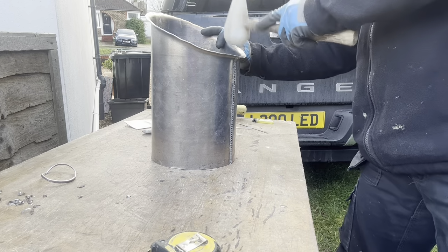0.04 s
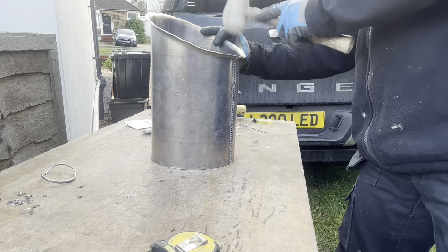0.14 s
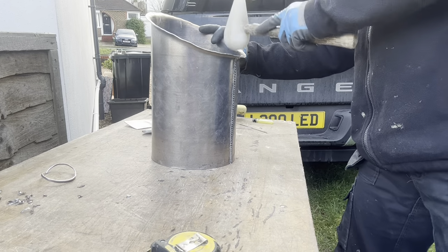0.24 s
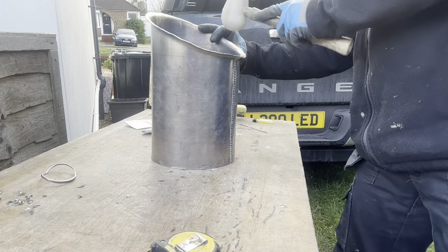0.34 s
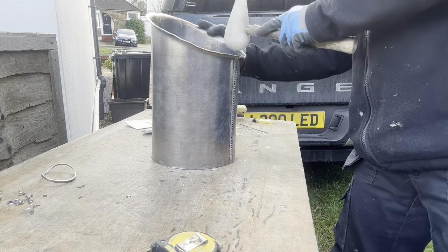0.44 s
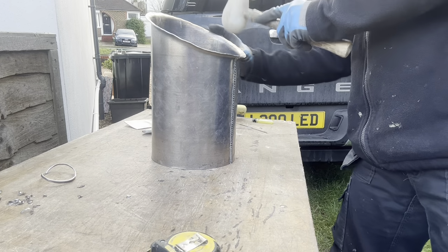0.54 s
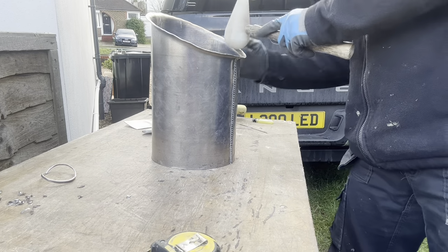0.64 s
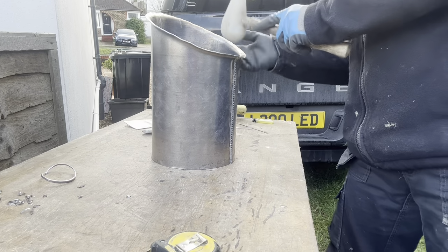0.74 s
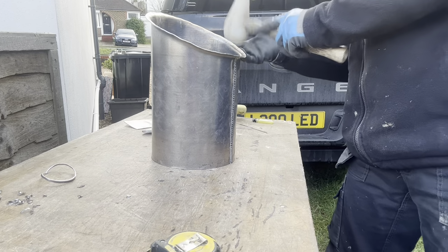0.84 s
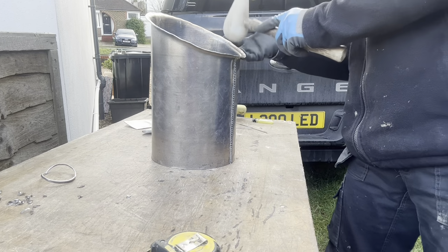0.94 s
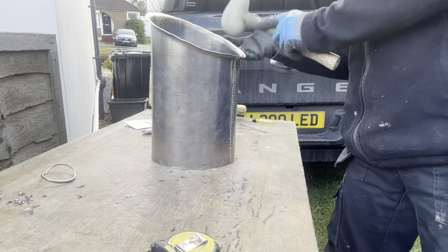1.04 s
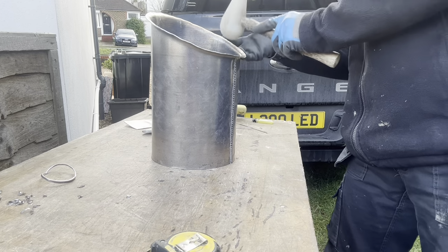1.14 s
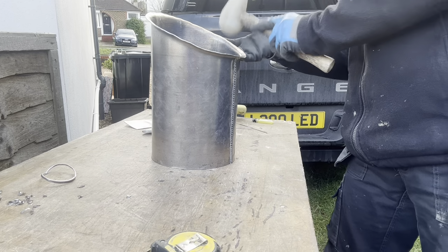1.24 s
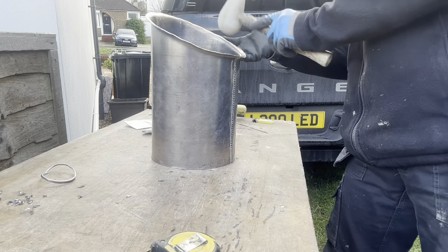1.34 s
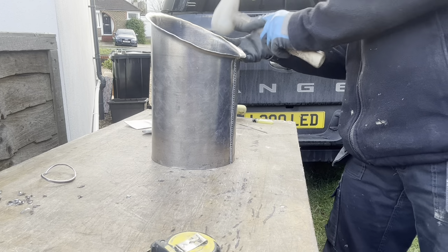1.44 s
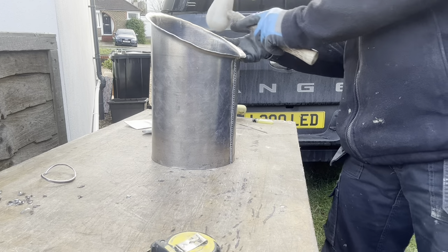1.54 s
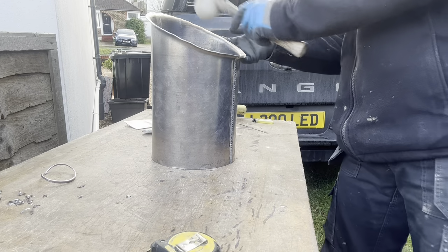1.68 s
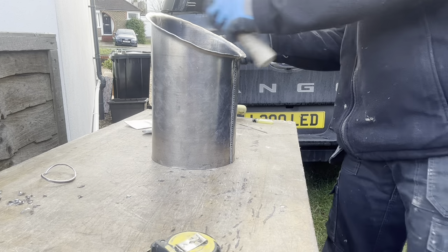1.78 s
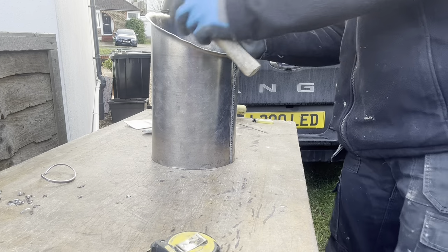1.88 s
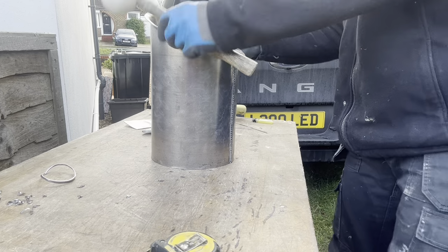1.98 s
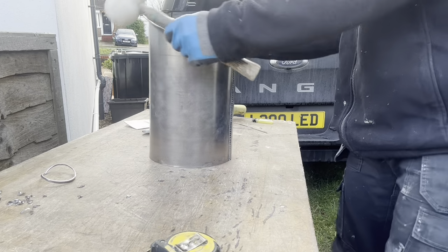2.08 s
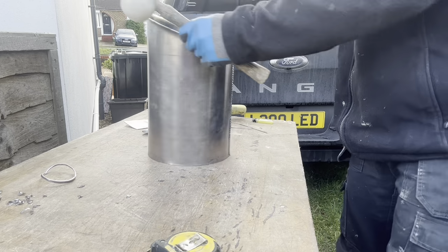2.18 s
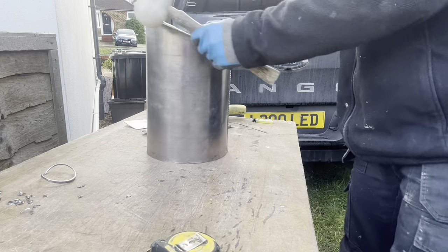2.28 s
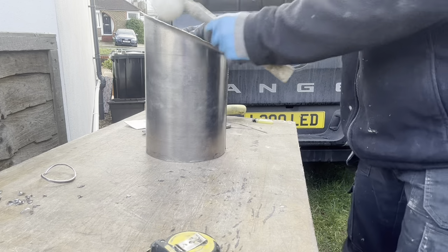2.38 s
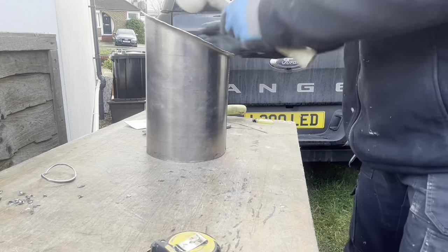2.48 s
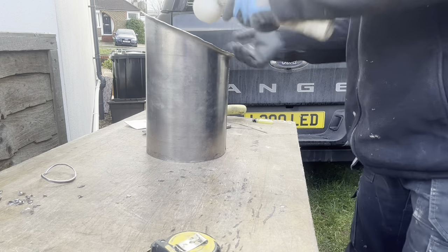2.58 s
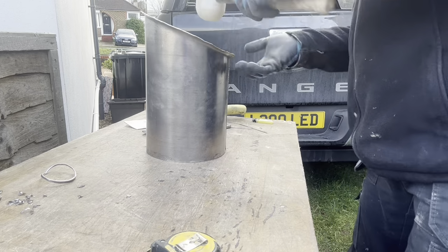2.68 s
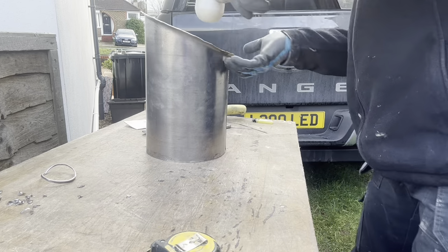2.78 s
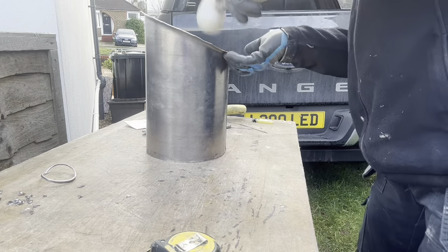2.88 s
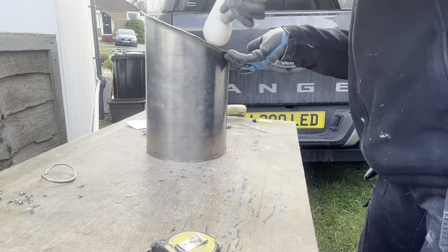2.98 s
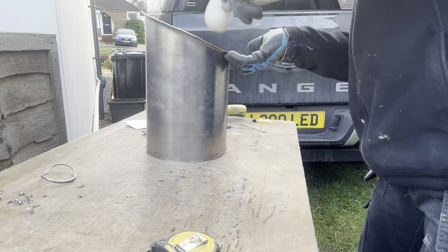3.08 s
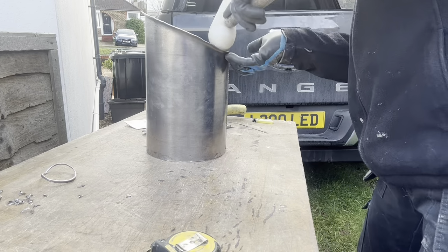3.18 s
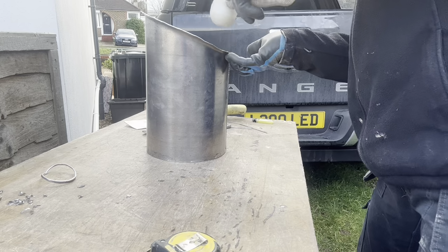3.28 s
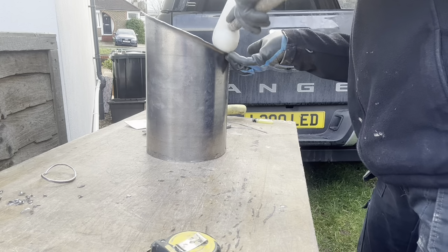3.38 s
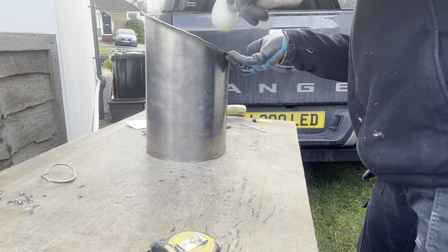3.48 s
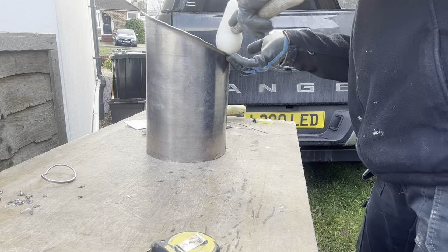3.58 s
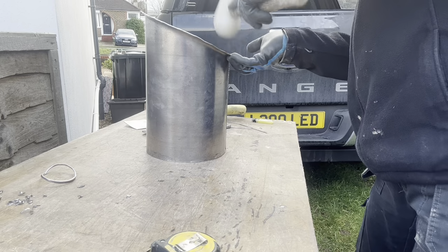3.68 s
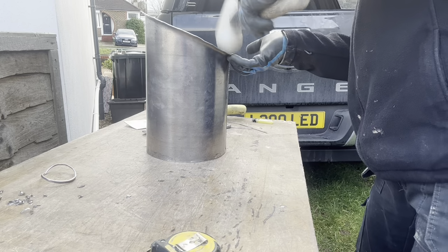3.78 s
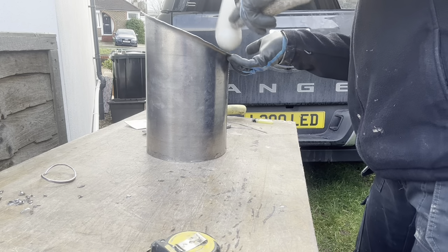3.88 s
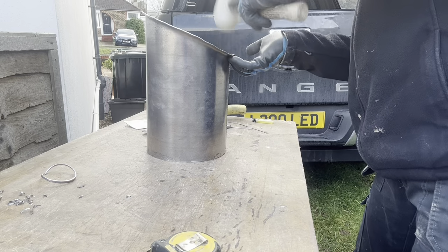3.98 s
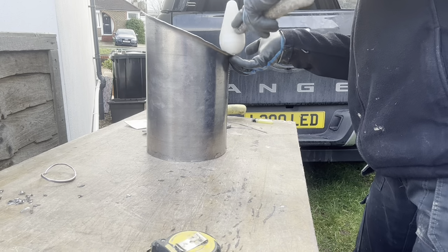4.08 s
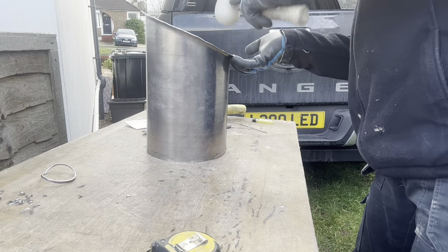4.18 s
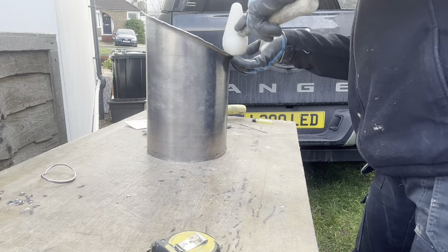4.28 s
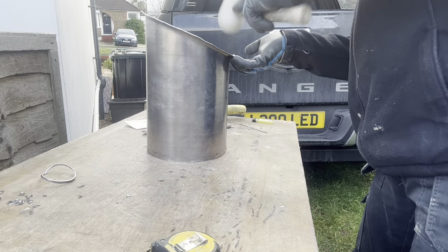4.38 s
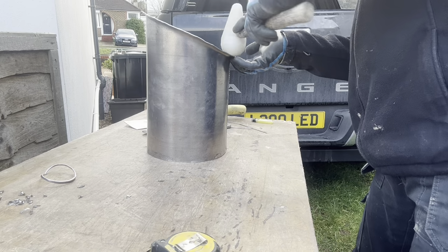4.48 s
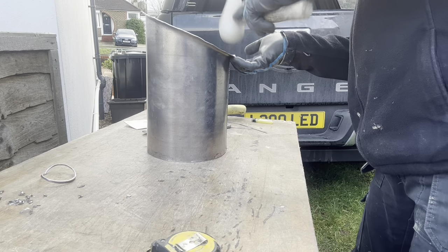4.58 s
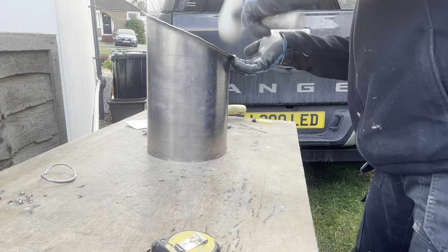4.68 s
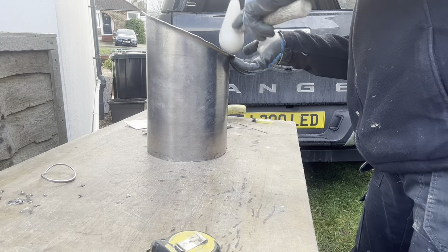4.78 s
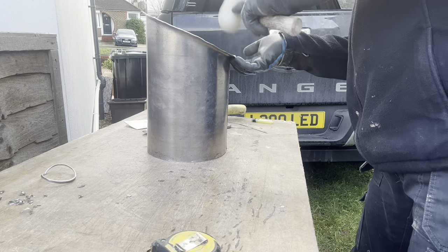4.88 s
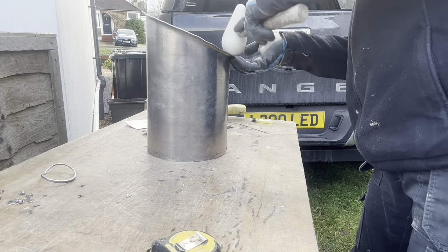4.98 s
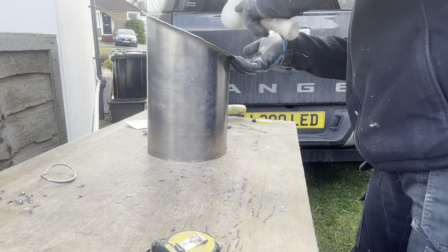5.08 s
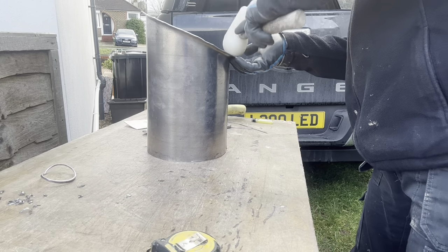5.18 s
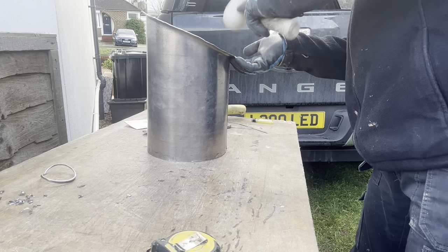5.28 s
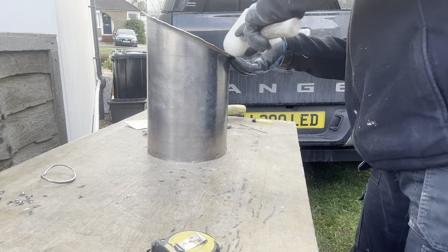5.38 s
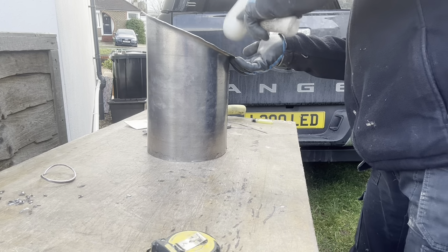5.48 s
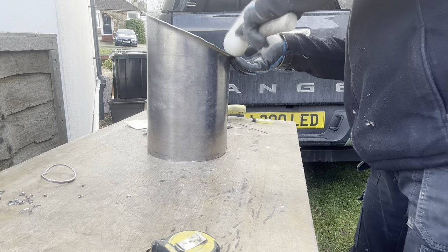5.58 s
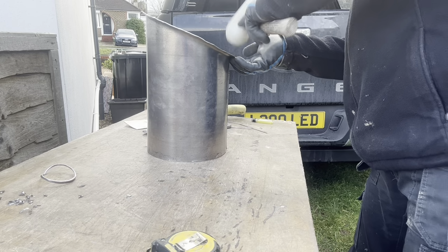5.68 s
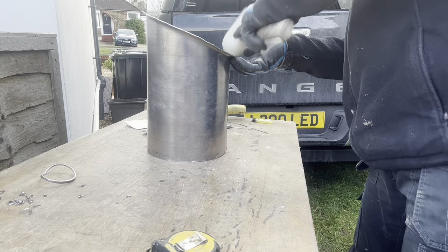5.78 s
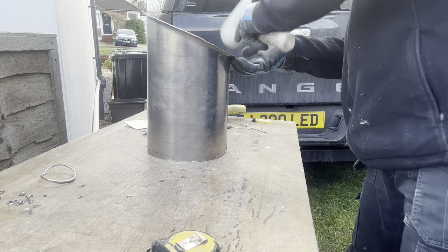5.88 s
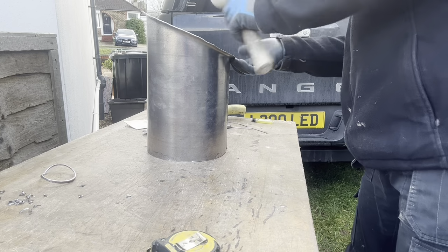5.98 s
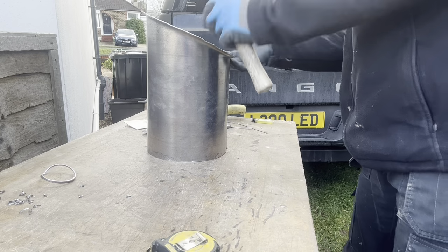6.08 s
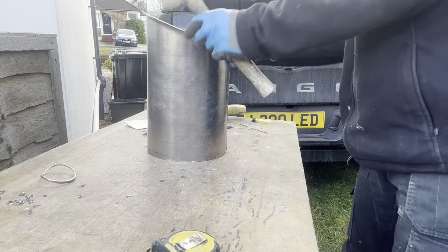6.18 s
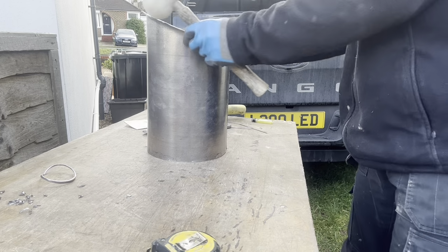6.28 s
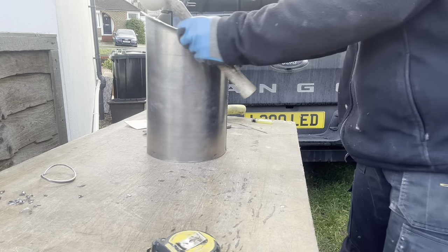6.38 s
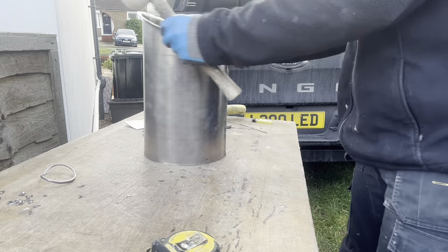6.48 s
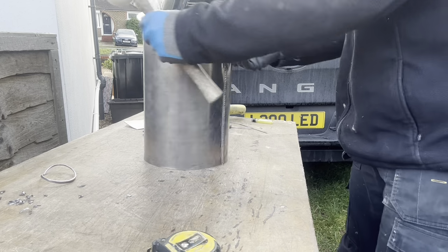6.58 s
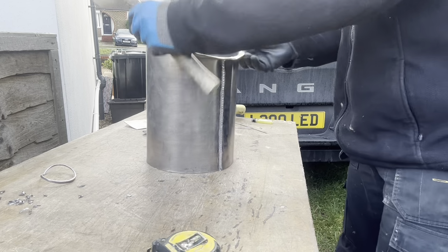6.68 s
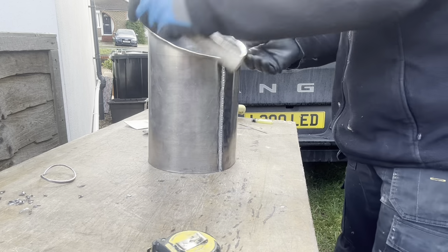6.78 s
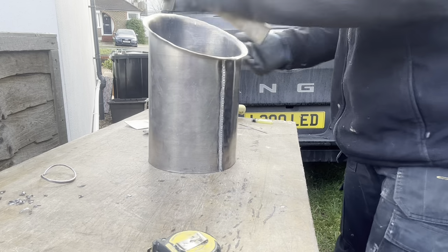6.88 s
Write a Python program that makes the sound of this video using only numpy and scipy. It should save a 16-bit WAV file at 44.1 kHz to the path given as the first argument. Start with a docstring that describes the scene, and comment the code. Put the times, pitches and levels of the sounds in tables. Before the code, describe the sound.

Outdoors in a yard, heard close in stereo over a faint distant hush and low breeze rumble. The tail of a mallet blow opens the scene, then hard plastic raps a lead tube at about 0.17, 0.39, 0.62, 0.84, 1.06, 1.25, 1.44 and 1.56 seconds, weakening towards the end. Each blow is a short click and dead metallic clack, with a low thud from the plywood, tiny knocks of the hopping foot and a quick rattle. Around 2.05 to 2.25 the tube is dragged round: a low juddering scrape with grit and jolts. After a pause, a harder, even run starts at 2.9 and continues every 0.22 seconds until 5.76. Faint clinks and loose rattles fill the gaps, and the breeze swells from about 5 seconds. From 6.45 to 6.75 a louder drag judders and bumps, followed by small gritty ticks near 6.8.

```python
"""Dressing a lead tube outdoors

In a yard, close to two microphone ports, a plastic mallet dresses the rim of a lead tube on a plywood bench.
Two quick runs of blows: each is a noise-burst click, a dead clack of damped modes, a gliding thud of the board,
a chatter of knocks from the tube's foot and a short noise tail from the yard.
After each run the tube is dragged round on the board, heard as coloured noise with jolts, ticks and clinks.
A light breeze, low coloured noise, rumbles on the microphone over a faint distant hush."""
import sys
import numpy as np
from scipy import signal
from scipy.fft import rfft, irfft, next_fast_len
from scipy.io import wavfile

SR = 44100
rng = np.random.default_rng(int(sys.argv[2]) if len(sys.argv) > 2 else 0)


def unload_wav(signal):
    """Save mono or channel-first audio to the path in sys.argv[1] as 16-bit WAV at rate SR, clipped to [-1, 1]."""
    wavfile.write(
        sys.argv[1],
        SR,
        np.round(np.clip(np.atleast_2d(signal).T, -1, 1) * 32767).astype(np.int16),
    )


N = 306054
TIME = np.arange(N) / SR   # s, the whole scene
AGE = TIME[:SR // 2]       # s since a contact


def from_db(db):
    """Decibels to gain."""
    return 10 ** (np.asarray(db) / 20)


def rms_one(x):
    """Scale to rms 1."""
    return x / np.sqrt(np.mean(x ** 2) + 1e-20)


def fade(t60):
    """A decay that loses 60 dB in t60 seconds."""
    return np.exp(-np.log(1000) * AGE / t60)


def add(track, s, sound):
    """Mix a sound into a track at time s; it may have begun before time zero."""
    start = round(s * SR)
    part = sound[..., max(-start, 0):track.shape[-1] - start]
    begin = max(start, 0)
    track[..., begin:begin + part.shape[-1]] += part


def colour(x, spectrum):
    """Causal (minimum-phase) filter with the given (Hz, dB) response."""
    size = 2 * next_fast_len(x.shape[-1] // 2 + 2048)
    hz, db = np.transpose(sorted(map(tuple, spectrum)))
    bins = np.maximum(np.fft.rfftfreq(size, 1 / SR), 1)
    gain = from_db(np.interp(np.log(bins), np.log(hz), db))
    # folding the cepstrum onto positive time gives minimum phase
    cepstrum = irfft(np.log(gain))
    cepstrum[1:size // 2] *= 2
    cepstrum[size // 2 + 1:] = 0
    response = np.exp(rfft(cepstrum))
    return irfft(rfft(x, size) * response)[..., :x.shape[-1]]


def drift(rate, size=N):
    """Slow chance of rms 1, through rate random points per second."""
    knots = rng.standard_normal(4096)
    return rms_one(np.interp(TIME[:size] * rate, np.arange(len(knots)), knots))


def noise_pair(apart_db, size):
    """White noise at two close ports: shared in the bass, partly opposed higher up."""
    mid, side = rng.standard_normal((2, size))
    highpass = signal.butter(1, 700, "high", fs=SR, output="sos")
    side = signal.sosfilt(highpass, side)
    return rms_one(mid + from_db(apart_db) * side * np.array([[1], [-1]]))


def band(x, hz, skirt_db):
    """A broad resonance at hz, changed by skirt_db a quarter octave away."""
    octaves = np.array([-3, -.25, 0, .25, 1.5])
    skirts = skirt_db * np.sqrt(abs(octaves) / .25)
    return colour(x, zip(hz * 2 ** octaves, skirts))


# the breeze on the ports, colour before levelling: (f/Hz, level/dB per Hz)
BREEZE_COLOUR = [(12, -38), (25, -30), (50, -0.5), (70, -2), (110, -9.5), (150, -12.5), (260, -23.5),
                 (400, -29.5), (600, -48.5), (1300, -90.5)]
# the breeze freshens, then eases: (t/s, rumble level/dB before gusts)
BREEZE_LEVEL = [(0, -42.5), (2.7, -42.5), (5.2, -33), (6.4, -30.5), (6.94, -34)]
# the distant hush, colour before levelling: (f/Hz, level/dB per Hz)
HUSH_COLOUR = [(150, 4), (380, 1), (480, -8.5), (700, -8), (1080, -5), (1350, -13.5), (1800, -30.5),
               (2150, -30.5), (3200, -24.5), (4300, -32.5), (6000, -25), (8500, -43), (10300, -33),
               (16000, -53)]
# brief faint hisses: (t/s of the peak, length/s from the peak to 1/e, level/dB, f/Hz)
SOFT_HISSES = [(1.855, 0.063, -64, 5550), (2.637, 0.097, -72, 3000), (6.084, 0.0022, -56, 7520)]


def outdoors():
    """Lumpy breeze on the ports over a distant hush, with a faint wavering band and a few soft hisses."""
    gusts = from_db(2.3 * drift(12))
    rumble_db = np.interp(TIME, *np.transpose(BREEZE_LEVEL))
    ports = noise_pair(apart_db=13, size=N)
    breeze = rms_one(colour(ports, BREEZE_COLOUR)) * gusts * from_db(rumble_db)
    hush = from_db(-54.5) * rms_one(colour(noise_pair(apart_db=1, size=N), HUSH_COLOUR))
    waver_band = rms_one(band(noise_pair(apart_db=-8, size=N), 1790, skirt_db=-22))
    waver = from_db(-72 + 5 * drift(35)) * waver_band
    out = breeze + hush + waver
    for s, length, db, hz in SOFT_HISSES:
        swell = np.exp(-((TIME - s) / length) ** 2)
        hiss = rms_one(band(rng.standard_normal(N), hz, skirt_db=-5))
        out += from_db(db) * swell * hiss
    return out


# the tube is dragged round: (t/s of greatest speed, level/dB of that speed, speeding up/s, slowing down/s)
DRAG_MOVES = [(2.148, -16.5, 0.05, 0.084), (6.595, -13.5, 0.087, 0.093)]


def drag_speed():
    """Each drag gathers speed, peaks and comes to rest."""
    steepness = 2.85   # how sharply a drag starts and stops
    speed = np.zeros(N)
    for s, db, rise, fall in DRAG_MOVES:
        away = np.maximum((s - TIME) / rise, (TIME - s) / fall)
        speed += from_db(db) / (1 + away ** steepness)
    return speed


def rub(spectrum, level_db, uneven_db):
    """Friction noise of the given colour, its strength wavering by uneven_db."""
    slips = noise_pair(apart_db=0.5, size=N) * from_db(uneven_db * drift(160))
    return from_db(level_db) * rms_one(colour(slips, spectrum))


# the foot juddering on plywood, colour before levelling: (f/Hz, level/dB)
JUDDER_COLOUR = [(35, -26.5), (60, -11), (113, -2.5), (139, -28), (171, -6), (205, -3.5), (246, -4),
                 (322, -10), (396, -7), (493, -19), (584, -19), (962, -37), (1100, -34), (1430, -62),
                 (2420, -120)]
# grit under the foot, also in the late rattles: (f/Hz, level/dB)
GRIT_COLOUR = [(530, -26), (900, -4), (1470, -8.5), (1750, 0), (2250, -20.5), (2420, -15), (4150, -25),
               (4570, -25.5), (6180, -29.5), (7400, -36), (8350, -68), (10100, -37), (12400, -59.5),
               (13500, -41), (16000, -56)]


def sliding():
    """The foot of the tube judders over the plywood, rubbing on grit; both grow with its speed."""
    speed = drag_speed()
    judder = speed * rub(JUDDER_COLOUR, level_db=-6, uneven_db=0.0)
    # the lower power makes grit swell more gently than judder
    grit = speed ** .8 * rub(GRIT_COLOUR, level_db=-25.5, uneven_db=3.5)
    return judder + grit


def ring(modes, scatter_db, detune, swell_cycles):
    """Every contact lands elsewhere, so modes shift in strength and pitch, the high ones most in pitch."""
    hz, db, t60 = np.transpose(modes)[:, :, None]
    strength, shift, phase = rng.standard_normal((3, len(hz), 1))
    spread = detune + .06 * np.clip(hz / 2000 - 1, 0, 1)
    swell = 1 - np.exp(-(AGE * hz / swell_cycles) ** 2)   # low modes take longer to get going
    waves = np.sin(2 * np.pi * (hz * (1 + spread * shift) * AGE + phase))
    gain = from_db(db + scatter_db * strength)
    return np.sum(gain * swell * fade(t60) * waves, axis=0)


def thud(hz, ring_db, level_db, peak_s, free_hz, release_s, t60):
    """Tube and board heave low under the load of a contact, then ring towards free_hz once released."""
    released = 1 - np.exp(-(AGE / release_s) ** 4)
    pitch = hz + (free_hz - hz) * released
    heave = (AGE / peak_s) ** 2 * np.exp(2 - 2 * AGE / peak_s)
    after = from_db(ring_db) * released * fade(t60)
    return from_db(level_db) * (heave + after) * np.sin(2 * np.pi * np.cumsum(pitch) / SR)


# modes of a soft clink, before scatter: (f/Hz, level/dB, t60/s)
CLINK_MODES = [(1552, -7, 0.078), (1600, -16, 0.076), (1891, -4.5, 0.05), (1880, -15.5, 0.02)]


def clinks(count):
    """The mallet shifts in the hand: random light touches, dealt among spots that each ring differently."""
    per_s, loudest_db, range_db = 14, -47, 10   # levels of the touch, before its modes
    out = np.zeros(N)
    for _ in range(count):
        touched = rng.random(N) < per_s / count / SR
        touches = touched * from_db(loudest_db - range_db * rng.random(N))
        spot = ring(CLINK_MODES, scatter_db=5.5, detune=0.015, swell_cycles=6.7)
        out += signal.fftconvolve(touches, spot)[:N]
    return out


def settling(grain_db, grain_t60, count):
    """Loose bits settle after each blow: late, faint rattles, each a gritty tick with a clink in it."""
    level_db, from_s, span_s = -41.5, .06, 0.16   # upper level at 0 dB force, earliest delay, spread of delays
    out = np.zeros(N)
    for s, force_db, *_ in MALLET_BLOWS:
        for when, size in rng.random((count, 2)):
            burst = rng.standard_normal(len(AGE)) * fade(grain_t60)
            grain = from_db(grain_db) * colour(burst, GRIT_COLOUR)
            clink = ring(CLINK_MODES, scatter_db=4, detune=0.029, swell_cycles=3.4)
            gain = from_db(level_db + force_db / 2) * size
            add(out, s + from_s + when * span_s, gain * (grain + clink))
    return out


# the tube catches and jolts on the board as it is turned: (t/s, relative level/dB)
TURNING_JOLTS = [(2.055, -23.5), (2.105, -16.5), (2.123, -13), (2.156, -12.5), (2.177, -15), (2.213, -15),
                 (2.417, -34.5), (6.454, -22), (6.492, -22), (6.535, -9), (6.601, -8), (6.652, -14)]
# the clearest ticks of grit and of glove on the rim: (t/s, relative level/dB, f/Hz)
RIM_TICKS = [(0.104, -49, 2650), (2.06, -53, 2840), (2.1266, -49, 2500), (2.481, -50.5, 2600),
             (4.13, -60, 2730), (6.607, -37, 2700), (6.7058, -37.5, 2600), (6.8159, -42.5, 2700)]


def handling():
    """Jolts are soft contacts that shake mainly the low modes; light touches clink or tick."""
    out = clinks(count=6) + settling(grain_db=13, grain_t60=0.045, count=3)
    soft = [(700, 0), (1800, -6), (4000, -30)]   # (Hz, dB)
    for s, db in TURNING_JOLTS:
        tube = colour(ring(TUBE_MODES, scatter_db=2.0, detune=.04, swell_cycles=.8), soft)
        board = thud(228.8, ring_db=-4.5, level_db=-5.5, peak_s=0.0046, free_hz=262.8,
                     release_s=0.018, t60=0.14)
        add(out, s, from_db(db + 8.5) * (from_db(-6.0) * tube + board))
    for s, db, hz in RIM_TICKS:
        burst = rng.standard_normal(len(AGE)) * fade(0.11)
        add(out, s, from_db(db + 10.5) * band(burst, hz, skirt_db=-10.5))
    return out


# tail of rattle and yard: (f/Hz, level/dB per Hz)
WASH_COLOUR = [(60, -5), (150, 3.5), (300, 8), (550, -11), (900, -17.5), (1300, -20), (1700, -11),
               (2150, -25), (2700, -26.5), (4000, -32.5), (7200, -41), (8600, -55.5), (13800, -53),
               (16000, -58)]


def wash(t60, yard_db, yard_t60, rise, uneven_db):
    """Dense, quickly damped rattling of tube and bench, then the uneven tail of the yard."""
    near = noise_pair(apart_db=0.5, size=len(AGE)) * fade(t60)
    far = noise_pair(apart_db=0, size=len(AGE)) * fade(yard_t60) * from_db(yard_db)
    lumps = from_db(uneven_db * drift(108.1, size=len(AGE)))
    onset = 1 - np.exp(-AGE / rise)
    return colour((near + far) * lumps * onset, WASH_COLOUR)


def chatter(level_db, span_s, fall_db, count):
    """The foot of the tube hops on the board: a few uneven knocks, tending weaker, after a blow."""
    foot = [(200, -19), (750, 18), (1100, 18.5), (1700, -8), (2300, -14), (4000, -26.0),
            (7200, -11), (9000, -24)]   # (Hz, dB)
    knocks = np.zeros(len(AGE))
    for when, size in rng.random((count, 2)):
        grain = rng.standard_normal(len(AGE)) * fade(0.036)
        grain /= np.linalg.norm(grain)
        add(knocks, (.15 + when) * span_s, from_db(level_db + fall_db * when) * size * grain)
    return colour(knocks, foot)


# plastic on lead: (f/Hz, level/dB per Hz)
CLICK_COLOUR = [(200, 3), (900, -1.5), (1600, 13), (2100, 2.5), (3000, -16), (4200, 6.5), (6500, -1.5),
                (7600, 5.5), (8800, -14), (10300, -7.5), (11400, -9), (12400, -6.5), (14500, -13),
                (16000, -47)]


def click(crunch_db, t60, contact_s):
    """Hard plastic presses into the metal for a millisecond or two, with a brief crunch as the lead yields."""
    slap = (AGE / contact_s) ** 2 * np.exp(2 - 2 * AGE / contact_s)
    crunch = from_db(crunch_db) * (1 - np.exp(-(AGE / contact_s) ** 2)) * fade(t60)
    contact = (slap + crunch) * rng.standard_normal(len(AGE))
    return colour(contact / np.linalg.norm(contact), CLICK_COLOUR)


# blows: (t/s, force level/dB before growth, thud weight level/dB, contact sizzle level/dB, loaded thud f/Hz)
MALLET_BLOWS = [(-.05, 0, -4, -2, 225), (0.1702, -2.5, 4, -0.5, 212.3), (0.391, -2, 1, -2.5, 201),
                (.621, -0.5, 0, -4, 248.4), (.841, -3, -.5, 0, 183), (1.059, -6.5, -1.5, 1, 164),
                (1.252, -6.5, -1.5, -3, 171.4), (1.442, -5.5, -3, -2, 177.6), (1.5555, -9, 4, -1, 231),
                (2.895, -5, .5, 3, 189), (3.1047, 0, -3.5, 0, 190), (3.324, 1.5, -5, 1.5, 256.4),
                (3.548, 3, -3, 1, 206), (3.7729, 2.5, -0.5, 4, 236), (4.005, 3, 0, 3.5, 188.2),
                (4.228, 2, 2.5, 4.5, 216), (4.4522, 2.5, 3, -1.5, 212), (4.689, 5, 1, -4.5, 227.5),
                (4.909, 3, 1.5, 0, 205), (5.1245, 4, 0.5, -2.5, 196.5), (5.346, 4, 0.5, -3.5, 239.7),
                (5.565, 1.35, 0, -6.5, 236), (5.764, 2.5, -4, -1, 176)]
# where click, thud, knock, clack and sizzle lie: f/Hz
BLOW_BANDS = [5500, 220, 550, 1600, 12000]
# harder blows bring out the knock most: level/dB per dB of force, for each of those bands
FORCE_GROWTH = [0.95, 0.76, 1.4, 0.79, 0.75]
# the tube on its board, before scatter and the blow's tone: (f/Hz, level/dB, t60/s)
TUBE_MODES = [(108.1, -21, 0.22), (176.8, -9.5, 0.12), (246, -24.5, 0.14), (315.7, -19, 0.16),
              (392.7, -19.5, 0.19), (436, -26, 0.036), (572.5, -26, 0.16), (727.7, -23, .18),
              (790, -49, 0.043), (1316, -32, 0.087), (1548, -40, 0.24), (1661, -20, 0.02),
              (1787, -26.5, 0.069), (2564, -27, 0.057), (3016, -27.5, 0.024), (3030, -46, 0.2)]


def mallet():
    """Force sets the level and colour of each blow; aim adds weight to the thud or sizzle to the contact."""
    out = np.zeros((2, N))
    for s, force_db, weight_db, sizzle_db, hz in MALLET_BLOWS:
        accent = force_db * np.array(FORCE_GROWTH) + [0, weight_db, 0, 0, sizzle_db]
        tone = list(zip(BLOW_BANDS, accent))
        snap = from_db(-3.5) * click(crunch_db=-5, t60=0.075, contact_s=0.00105)
        tube = ring(TUBE_MODES, scatter_db=3.0, detune=.015, swell_cycles=2.74)
        after_ring_db = 3.04 + 0.32 * force_db   # the board rings on
        board = thud(hz, after_ring_db, level_db=-11, peak_s=0.0075, free_hz=265.4,
                     release_s=0.0231, t60=0.17)
        hops = chatter(level_db=0, span_s=0.084, fall_db=-19, count=5)
        tail = from_db(3.5) * wash(t60=0.17, yard_db=-24.0, yard_t60=0.87, rise=0.0073, uneven_db=1.5)
        add(out, s, colour(snap + tube + board + hops + tail, tone))
    return out


# lead of the left microphone port, negative where it lags: (f/Hz, phase/rad)
PORT_LEAD = [(0, 0), (250, -1.5), (420, -2.1), (600, -2.8), (1050, -3.9), (1400, -6), (2100, -7),
             (2300, -8.8), (2900, -10.6), (3500, -12.4), (3900, -14.9), (4800, -16.2), (5500, -17.9),
             (6500, -20.8), (8200, -22), (10200, -25.2), (14500, -31.5), (16000, -32)]
# left port over right: (f/Hz, level/dB)
PORT_LEAN = [(60, -0.5), (110, 2), (200, 0.5), (380, 2.7), (700, -5.5), (1290, 2.3), (2380, 0.7),
             (4400, -1.3), (8120, -1.0), (15000, 1)]


def scene():
    """All sources, reaching the right port a little before the left."""
    size = next_fast_len(N + SR // 2)
    bins = np.fft.rfftfreq(size, 1 / SR)
    left, right = rfft(outdoors() + sliding() + handling() + mallet(), size)
    phase = np.interp(bins, *np.transpose(PORT_LEAD))
    lean = from_db(np.interp(bins, *np.transpose(PORT_LEAN)) / 2)   # half to each port
    ports = np.array([left * lean * np.exp(1j * phase), right / lean])
    return irfft(ports, size)[:, :N]


def record(dry):
    """The highest peaks are rounded and the top is cut."""
    rounded = dry / (1 + dry ** 6) ** (1 / 6)
    lowpass = signal.ellip(10, .1, 80, 16300, fs=SR, output="sos")   # cutoff in Hz
    return signal.sosfilt(lowpass, rounded)


dry = scene()
out = record(dry)
unload_wav(out)
```